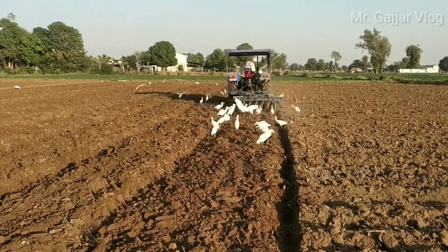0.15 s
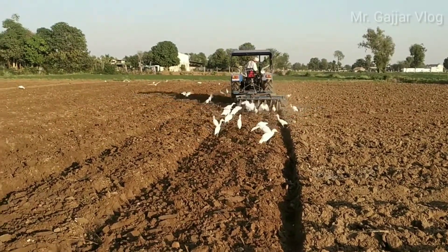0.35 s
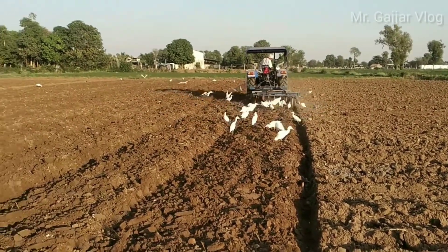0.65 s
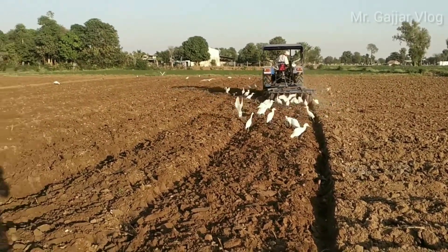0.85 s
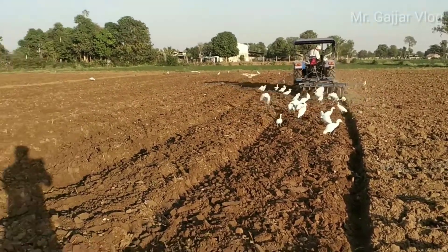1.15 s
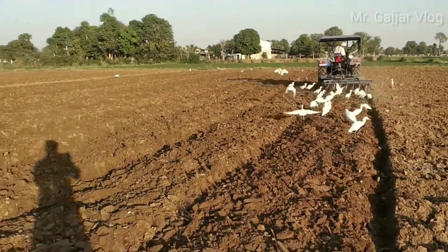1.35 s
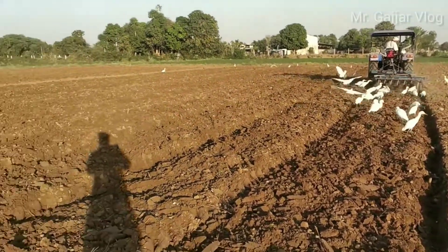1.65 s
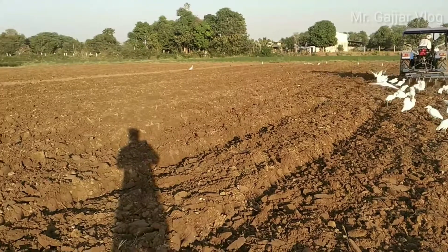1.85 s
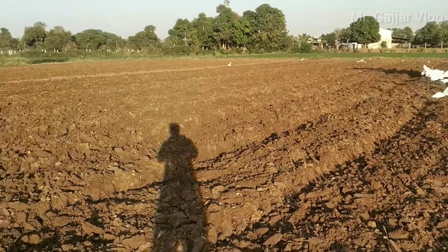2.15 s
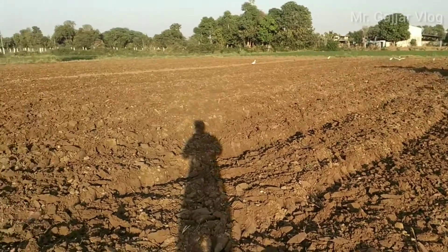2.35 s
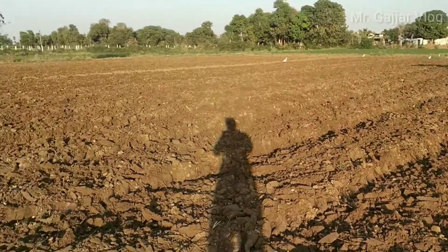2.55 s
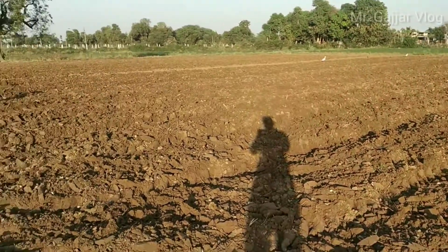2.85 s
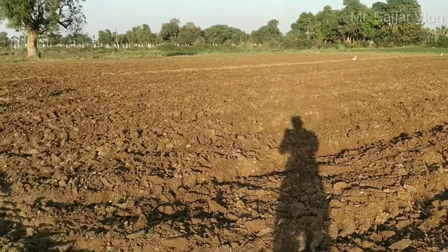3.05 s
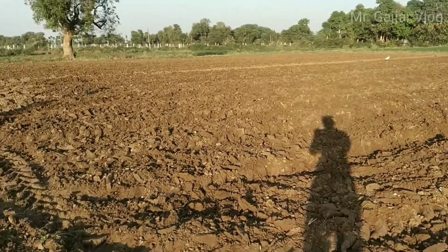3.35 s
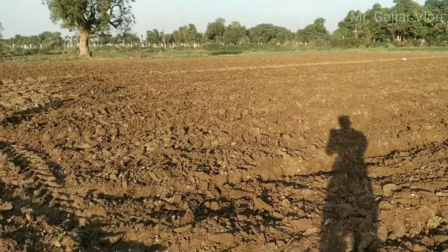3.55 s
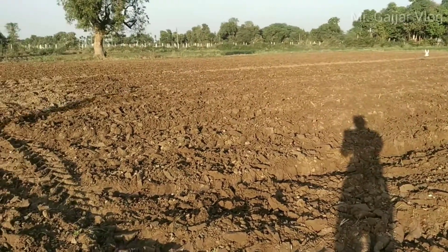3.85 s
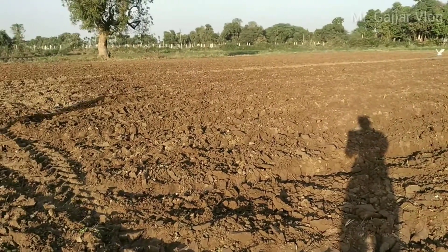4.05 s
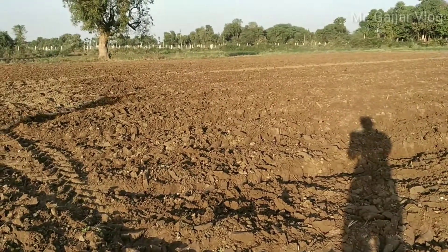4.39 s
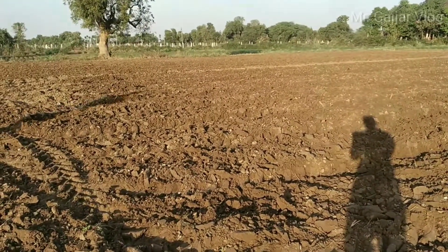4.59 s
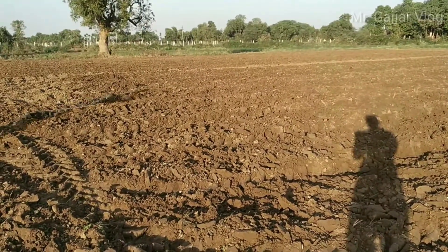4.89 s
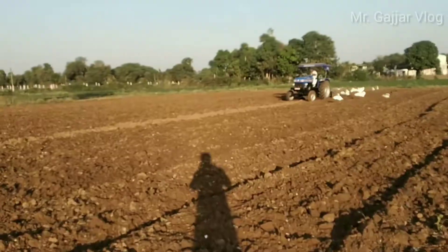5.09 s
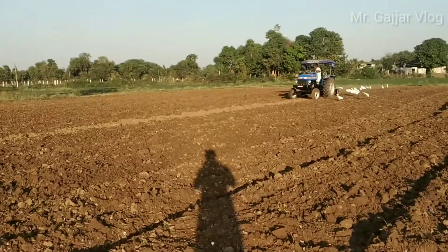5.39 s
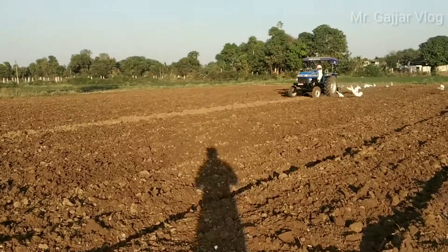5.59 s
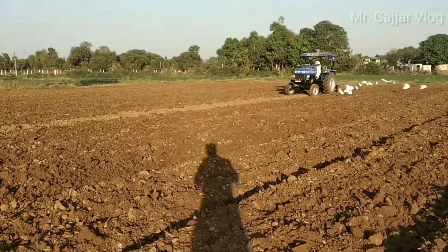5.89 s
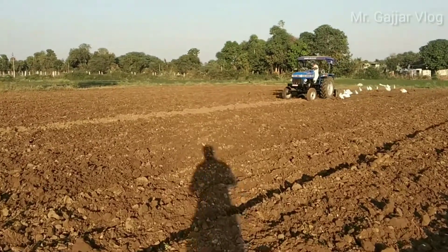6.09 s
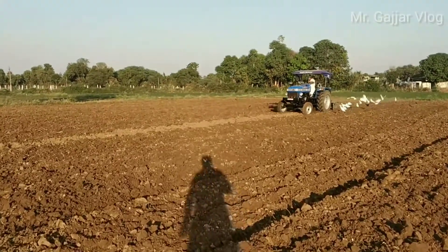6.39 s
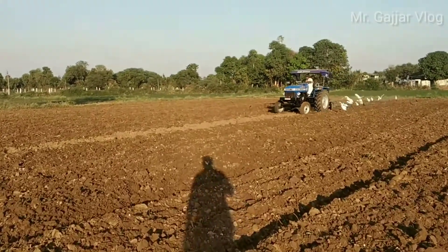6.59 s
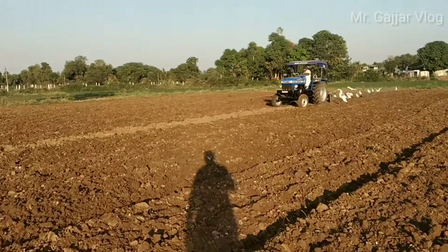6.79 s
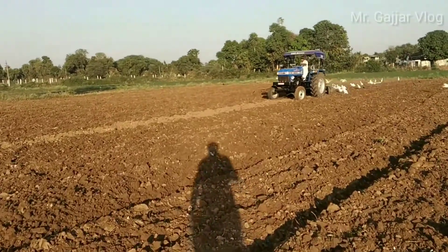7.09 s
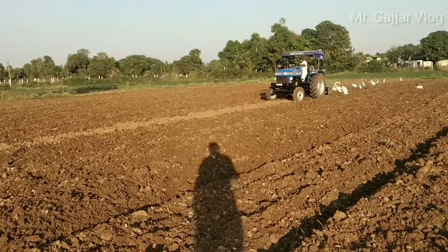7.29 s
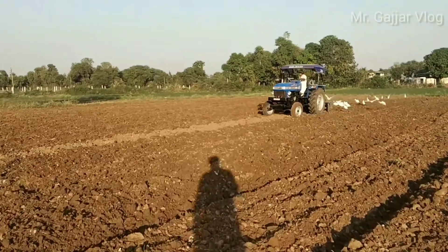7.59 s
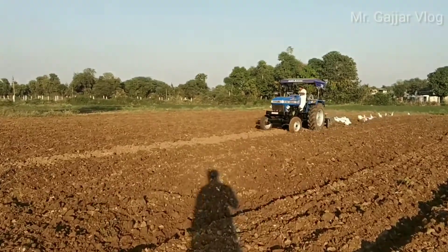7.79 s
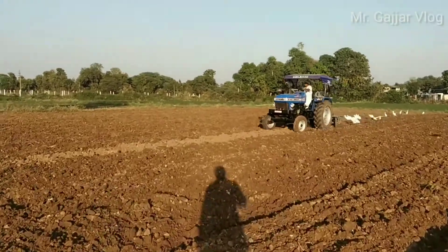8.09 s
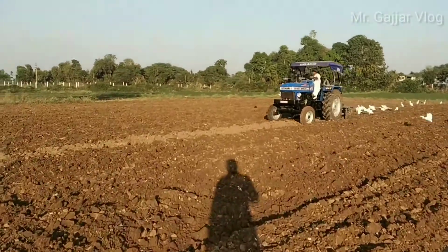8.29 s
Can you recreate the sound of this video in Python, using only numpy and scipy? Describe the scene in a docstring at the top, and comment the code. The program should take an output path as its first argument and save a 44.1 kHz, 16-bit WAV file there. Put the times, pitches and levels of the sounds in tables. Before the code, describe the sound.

Low wavering tractor drone with metallic clatter and gritty soil hiss, a sharp microphone bump, then suddenly a higher-revving, hard-knocking engine slowly approaching.

```python
"""Diesel tractor with a disc harrow

A three-cylinder tractor first draws away: cycle-locked exhaust lines drone, their speed sagging and recovering.
Timed blows ring its metal, shaped noise makes roar and soil hiss, and enveloped noise and tones grind and squeak.
Touches on the microphone's case thud and click, most strongly just after 4 s.
At 4.84 s the scene switches abruptly: the tractor comes closer at higher revs, knocking brightly."""
import sys
import numpy as np
from scipy import signal
from scipy.fft import rfft, irfft, next_fast_len
from scipy.io import wavfile
from scipy.ndimage import map_coordinates

SR = 44100
rng = np.random.default_rng(int(sys.argv[2]) if len(sys.argv) > 2 else 0)


def generate_wav(signal):
    """Clip the signal to [-1, 1] and save it as 16-bit WAV at the path in sys.argv[1]."""
    frames = np.transpose(np.atleast_2d(signal))
    scaled = np.clip(frames, -1, 1) * 32767
    pcm = np.round(scaled).astype(np.int16)
    wavfile.write(sys.argv[1], SR, pcm)


N = 372204
T = np.arange(N) / SR
SWITCH_S = 4.84

# tractor metal resonances, going away: (frequency [Hz], width [Hz], relative level [dB])
PANEL_MODES_AWAY = [(596, 102, 5), (720, 185, -3.5)]
BLOCK_MODES_AWAY = [(930, 210, -2), (1340, 153, 1.5), (1690, 330, -8)]


def amp(db):
    """Decibels to gain."""
    return 10 ** (np.asarray(db) / 20)


def unit(x):
    """x at rms 1."""
    return x / np.sqrt(np.mean(x ** 2) + 1e-20)


def curves(rows):
    """One value per sample for each column after the time."""
    s, *cols = np.transpose(rows)
    return [np.interp(T, s, c) for c in cols]


def wobble(rate_hz):
    """A smooth random curve, rate_hz knots a second."""
    knots = rng.standard_normal(int(N * rate_hz / SR) + 4)
    return map_coordinates(knots, [T * rate_hz])


def swell(s, length_s):
    """Bell envelope around time s, down to e^-2 at length_s either side."""
    return np.exp(-2 * ((T - s) / length_s) ** 2)


def turning(s, duration_s, before, after):
    """A smooth change from one value to another around time s."""
    return before + (after - before) * (1 + np.tanh((T - s) / duration_s)) / 2


def filtered(x, response):
    """x times a complex response of frequency."""
    m = next_fast_len(N + SR // 2)
    return irfft(rfft(x, m) * response(np.fft.rfftfreq(m, 1 / SR)), m)[:N]


def ring(x, modes):
    """x through parallel (Hz, width Hz, dB) resonances of alternating sign."""
    def response(f):
        return sum((-1) ** k * amp(db) * 1j * f * width / (hz * hz - f * f + 1j * f * width)
                   for k, (hz, width, db) in enumerate(modes))
    return filtered(x, response)


def coloured(x, spectrum):
    """x shaped by (Hz, dB) points, at rms 1."""
    hz, db = np.transpose(spectrum)
    return unit(filtered(x, lambda f: amp(np.interp(np.log(f + 1), np.log(hz), db))))


def cyclic(cycle, share):
    """White noise of which a power share comes back alike in every engine cycle."""
    pattern = rng.standard_normal(size=4096)
    alike = pattern[(cycle % 1 * len(pattern)).astype(int)]
    return np.sqrt(share) * alike + np.sqrt(1 - share) * rng.standard_normal(N)


def firing(cycle, place, depth_db, regular):
    """White noise that swells with each of the three firings of a cycle."""
    return cyclic(cycle, regular) * amp(depth_db * np.cos(2 * np.pi * 3 * (cycle - place)))


def hunting(t):
    """The governor's swing around the asked speed, in rpm; it builds up, then settles."""
    period_s, crest_s = 0.504, 0.383
    # swing of the engine speed: (time [s], amplitude [rpm])
    hunt_depth = [(0, 20), (2.4, 42), (4, 22), (4.2, 0)]
    return np.cos(2 * np.pi * (t - crest_s) / period_s) * np.interp(t, *np.transpose(hunt_depth))


def exhaust(cycle, column, booms, waver_db, waver_rate_hz):
    """Pipe drone: cycle-locked lines waver and swell as they slide into the pipe's resonances."""
    # exhaust lines: (multiple of the four-stroke cycle, away [relative dB], closer [relative dB])
    exhaust_lines = [(3, -16.5, -14.5), (4, -21, -16.5), (5, -22, -16), (6, 1.5, -2.5), (7, -19.5, -24.5),
                     (8, -29, -26.5), (9, -15.5, -16), (10, -18.5, -39), (11, -30, -28.5), (12, -27, -30.5),
                     (14, -40.5, -34), (15, -44, -31.5), (18, -45.5, -34), (21, -32, -37), (24, -29.5, -36),
                     (27, -38, -48)]
    cycle_hz = np.gradient(cycle)[::100] * SR
    drone = 0
    for row in exhaust_lines:
        order = round(row[0])
        boom_db = sum(db * np.exp(-((order * cycle_hz - hz) / width) ** 2) for hz, width, db in booms)
        level_db = row[column] + np.interp(T, T[::100], boom_db) + waver_db * wobble(waver_rate_hz)
        drone = drone + amp(level_db) * np.sin(2 * np.pi * (order * cycle + rng.random()))
    return unit(drone)


def knocking(cycle, blows, column, modes, scatter_db, jitter_s, rattle, rattle_s, regular):
    """The same blows return every cycle; each trails a short rattle and rings the metal."""
    blows = np.array(blows)
    places = np.arange(int(cycle[-1]) + 1)[:, None] + blows[:, 0]
    when = np.interp(places, cycle, T) + jitter_s * rng.standard_normal(places.shape)
    size = amp(blows[:, column] + scatter_db * rng.standard_normal(places.shape))
    inside = (when > 0) & (places < cycle[-1])
    hits = np.bincount((when[inside] * SR).astype(int), size[inside], N)[:N]
    trail = signal.lfilter([1], [1, -np.exp(-1 / (rattle_s * SR))], hits)
    rattling = unit(trail * cyclic(cycle, regular))
    return unit(ring(unit(hits) + rattle * rattling, modes))


def puffing(cycle, spectrum, place, depth_db, regular):
    """Firing noise shaped by (Hz, dB) points."""
    return coloured(firing(cycle, place, depth_db, regular), spectrum)


def whine(cycle, levels_db, waver_db, smear_rad):
    """Gear lines follow the engine speed; each wavers in level and phase."""
    # gear tooth lines: (multiple of the four-stroke cycle)
    gear_orders = [33.3, 44.35, 52.1, 66.5, 76.3, 78.1, 80.2, 84.2, 88.4, 89.7, 99.1]
    lines = 0
    for order, db in zip(gear_orders, levels_db):
        level = amp(db) * unit(amp(waver_db * wobble(12)))
        lines = lines + level * np.sin(2 * np.pi * order * cycle + smear_rad * wobble(14))
    return np.sqrt(2) * lines


def reflected(x, lag_ms, share, low_hz, dull_hz, turn_rad):
    """A body returns a dulled, phase-turned echo; its changing lag slides notches through the sound."""
    thin = filtered(x, lambda f: f ** 4 / (f ** 4 + low_hz ** 4) / (1 + (f / dull_hz) ** 2))
    echo = signal.hilbert(thin, next_fast_len(N))[:N]
    delayed = np.interp(T - lag_ms / 1000, T, echo)
    return x + share * np.real(np.exp(1j * turn_rad) * delayed)


def going_away():
    """From behind, the exhaust surges with the fuel, metal knocks every cycle and soil hisses off the discs."""
    # speed that the throttle asks for: (time [s], speed [rpm])
    throttle = [(2.275, 1439.8), (3.814, 1589.9), (4.84, 1552.6)]
    # pipe resonances: (frequency [Hz], width [Hz], boost [dB])
    pipe_booms = [(107.5, 9.2, 10), (308, 15, 3), (352, 10, 8)]
    # blows of pistons, valves, injectors: (place in cycle [0-1], panel [relative dB], block [relative dB])
    blows = [(.05, -9, -10), (.22, -5.5, -7), (.42, -13, -2), (.55, -4, -3), (.67, -3.5, 0), (.77, -14, -3),
             (.885, -1, -10), (.98, -12, -3)]
    # engine, fan and soil roar: (frequency [Hz], relative level [dB])
    roar_spectrum = [(59, -36), (100, 0.5), (120, -24.5), (135, -3.5), (177, -13.5), (220, -19), (310, -15),
                     (390, -15), (619, -19.5), (733, -15.5), (845, -18), (1660, -21.5), (2200, -54),
                     (2860, -65), (4840, -120)]
    # soil hiss before and after the hand shifts: (frequency [Hz], relative level [dB])
    open_hiss = [(1060, -25), (1800, 1), (2410, -6.5), (2930, -4), (3320, 1), (3790, 1.5), (4540, -11),
                 (5310, -6), (6770, -13), (7580, -11.5), (8020, -20), (10400, -47.5), (17600, -120)]
    grip_hiss = [(1060, -29), (1800, 2), (2400, -1.5), (2900, -1.5), (3550, 3), (4400, -3.5), (5400, -5),
                 (6800, -13.5), (7700, -6), (8100, -16), (10400, -46)]
    # soil hiss before its waver: (time [s], level [dB])
    soil_levels = [(0, -58), (.8, -56), (1.5, -59), (2.05, -58.5), (2.35, -55.5), (3.0, -57.5),
                   (3.4, -56.5), (3.95, -57), (4.25, -57.5), (4.52, -54.5), (4.8, -56.5)]
    # gear lines, one per order: (level [dB])
    gear_levels_db = [-72, -68, -66, -65, -68.5, -77, -80.5, -69, -70, -74, -81]
    # echo lag as the person holding the microphone turns and sways: (time [s], lag [ms])
    echo_lags = [(0, 1.81), (.9, 1.8), (1.4, 1.59), (1.9, 1.56), (2.25, 1.35), (2.75, 1.27), (3.07, 1.11),
                 (3.35, 1.08), (3.9, .95), (4.4, .92)]
    fuel_lead_s, full_fuel_rpm = 0.024, 30  # fuel surges ahead of the speed; 30 rpm of swing is a full surge
    grip_s = 4.07  # the shifted hand then shades the block

    rpm = curves(throttle)[0] + hunting(T)
    cycle = np.cumsum(rpm) / (2 * 60 * SR)
    fuel = hunting(T + fuel_lead_s) / full_fuel_rpm
    panel_db = -52.5 - 0.78 * T  # fades as the tractor draws off
    block_db = -58 - 5 * (T > grip_s)
    drone = amp(-33 + 0.7 * fuel) * exhaust(cycle, 1, pipe_booms, waver_db=0.6, waver_rate_hz=11)
    panel = amp(panel_db) * knocking(cycle, blows, 1, PANEL_MODES_AWAY, scatter_db=1.5, jitter_s=0.0003,
                                     rattle=1.1, rattle_s=0.006, regular=0.35)
    block = amp(block_db) * knocking(cycle, blows, 2, BLOCK_MODES_AWAY, scatter_db=2.0, jitter_s=0.0002,
                                     rattle=2.5, rattle_s=0.008, regular=0.4)
    roar_db = (panel_db + block_db) / 2 + 9.5
    roar = amp(roar_db) * puffing(cycle, roar_spectrum, place=0.55, depth_db=0.5, regular=0.32)
    before = puffing(cycle, open_hiss, place=0.29, depth_db=2.0, regular=0.28)
    after = puffing(cycle, grip_hiss, place=0.29, depth_db=2.0, regular=0.28)
    hiss = amp(curves(soil_levels)[0] + 0.9 * wobble(24)) * np.where(T < grip_s, before, after)
    gears = whine(cycle, gear_levels_db, waver_db=6.0, smear_rad=0.46)
    share = turning(grip_s, 0.05, before=0.48, after=0.45)
    return drone + reflected(panel + block + roar + hiss + gears, curves(echo_lags)[0], share,
                             low_hz=330, dull_hz=3300, turn_rad=0.1)


def harrow():
    """Discs grind clods as bursts of gritty noise and squeak as brief, chattering tones."""
    # discs grinding through clods: (time [s], length [s], level [dB])
    scrapes = [(.33, 0.23, -58.5), (0.485, 0.011, -53), (0.54, 0.023, -47), (0.573, 0.019, -43),
               (0.617, 0.012, -50), (0.658, .012, -55), (1.024, 0.033, -59), (1.3, 0.069, -57),
               (1.75, 0.077, -55.5), (3.316, 0.078, -52.5)]
    # disc squeaks: (time [s], length [s], frequency [Hz], level [dB])
    squeak_events = [(0.534, .026, 4800, -53), (.582, .025, 4800, -58), (0.962, 0.065, 4810, -58.5),
                     (1.016, .03, 5450, -63.5), (1.285, 0.04, 4800, -62), (1.315, 0.032, 5390, -60.5),
                     (1.72, 0.032, 5400, -61), (1.79, .028, 5370, -63)]
    soil = coloured(rng.standard_normal(N), [(700, -12.5), (1600, 2.5), (3300, 15), (4200, 11),
                                             (5500, 6.5), (8000, -3.0)])
    grit = unit(soil * amp(2.5 * wobble(310)))
    grinding = grit * sum(amp(db) * swell(s, length) for s, length, db in scrapes)
    chatter = unit(amp(3 * wobble(120)))
    slip_rad = 0.9 * wobble(200)
    squeaks = chatter * sum(amp(db) * swell(s, length) * unit(np.sin(2 * np.pi * hz * T + slip_rad))
                            for s, length, hz, db in squeak_events)
    return grinding + squeaks


def stray_knocks():
    """Single stronger knocks ring the tractor's panels and block."""
    # stray knocks: (time [s], peak level [dB])
    knocks = [(.385, -42), (.495, -40), (1.298, -31.5), (2.153, -37)]
    modes = PANEL_MODES_AWAY + BLOCK_MODES_AWAY
    peak = np.abs(ring(signal.unit_impulse(N), modes)).max()
    s, db = np.transpose(knocks)
    return ring(np.bincount((s * SR).astype(int), amp(db), N), modes) / peak


def hollowed(x):
    """The microphone's case swallows a share of some bands."""
    # case dips: (frequency [Hz], width [Hz], share removed [0-1])
    case_dips = [(526, 200, 0.3), (1570, 110, 0.5), (4300, 1100, 0.6)]
    for hz, width_hz, share in case_dips:
        x = x - share * ring(x, [(hz, width_hz, 0)])
    return x


def bumps():
    """Fingers slip on the case in soft dents; it springs back with a push and swings in a low thud."""
    # touches, before the case dips: (time [s], thud gain [dB], click gain [dB], contact half-width [s])
    touches = [(4.009, -48, -28, 0.00013), (4.0514, -50, -16.5, 0.0002), (4.05208, -55, -20, 0.0001),
               (4.0527, -36, -15.5, 0.00012), (4.05368, -13.5, -14, 0.00011), (4.0566, -55, -28, .00012),
               (4.0682, -42, -20, 0.00008), (4.0705, -40, -24, 0.00007), (4.579, -55, -31, 0.00016),
               (4.762, -58, -25.5, 0.00014), (4.842, -38, -26, .0005), (5.832, -45, -26, 0.0003)]
    lead = SR // 200
    t = np.arange(-lead, SR // 4) / SR
    after = np.maximum(t, 0)
    swing = np.cos(2 * np.pi * 64 * after) * amp(-60 * after / 0.087)
    push = 1.4 * np.exp(-after / 0.0011)
    thud = (swing + push) * (1 - np.exp(-after / 0.00031))
    out = np.zeros(N + SR)
    for s, thud_db, click_db, contact_s in touches:
        dent = 1 / (1 + (t / contact_s) ** 2)
        scratch = 0.05 * rng.standard_normal(len(t)) * amp(-60 * np.abs(t) / 0.0037)
        start = round(s * SR) - lead
        out[start:start + len(t)] += amp(thud_db) * thud - amp(click_db) * (dent + scratch)
    return hollowed(out[:N])


def coming_closer():
    """From the front, the block knocks and injectors rasp; drone and panels grow as the distance shrinks."""
    # pipe resonances: (frequency [Hz], width [Hz], boost [dB])
    pipe_booms = [(104.5, 11.6, 5.8)]
    # blows of pistons, valves, injectors: (place in cycle [0-1], panel [relative dB], block [relative dB])
    blows = [(.03, -6, -22), (.145, -12, -1), (.21, -6, 0), (.3, -16, -9), (.37, -4.5, -20),
             (.445, -3.5, -20), (.48, -20, -2), (.548, -9, 0), (.66, 0, -11), (.755, -8, -6),
             (.835, -8, -7), (.895, -4.5, -4.5), (.955, -10, -5)]
    # panels, block, injector lines and bonnet: (frequency [Hz], width [Hz], relative level [dB])
    panel_modes = [(551.6, 62, 2.5), (678, 95, -1), (862, 152, -2.5)]
    block_modes = [(1033, 48, 0), (1209, 80, -3.5), (1385, 96, -1.5), (1780, 480, -17.5), (2387, 52, -15)]
    injector_modes = [(2380, 220, -4), (2893, 98, -2), (3570, 72, -2), (5160, 41, -7)]
    bonnet_modes = [(1993, 200, 2), (3780, 380, -2)]
    # roar, injector rasp, pipe gas noise and top treble: (frequency [Hz], relative level [dB])
    roar_spectrum = [(59, -22), (100, -15), (125, 0), (177, -26.5), (290, -24.5), (400, -26), (520, -13),
                     (700, -10.5), (870, -10), (1050, -13), (1350, -9), (1650, -20), (2050, -19),
                     (2900, -57.5), (4800, -120)]
    rasp_spectrum = [(1060, -28.5), (1800, -10.5), (2350, -4), (3000, -7), (3560, -2.5), (4300, -9.5),
                     (5200, -9), (7260, -13.5), (7720, -15.5), (8020, -47), (10400, -76)]
    chuff_spectrum = [(100, -38), (145, 4.5), (178, 5.5), (215, -7), (300, -5.5), (480, -13), (900, -46)]
    sizzle_spectrum = [(3500, -38.5), (5200, -10), (6100, 1.5), (6600, 4.5), (7600, 1.5), (8100, -24)]
    # block knock, injector ring, bonnet ring and top treble: (time [s], level [dB])
    knock_levels = [(4.88, -43.5), (5.3, -43.5), (5.69, -45), (6.08, -45), (6.3, -48.5), (6.77, -49),
                    (7.4, -50), (7.8, -46.5), (8.1, -46.5), (8.4, -45.5)]
    injector_levels = [(4.9, -73), (5.7, -55), (6.0, -53), (6.3, -59), (7.3, -56), (8.3, -56)]
    bonnet_levels = [(4.85, -52.5), (5.15, -52.5), (5.33, -47.5), (5.6, -48.5), (5.95, -53.5), (6.3, -60),
                     (6.8, -70)]
    treble_levels = [(4.85, -58), (5.2, -56), (5.6, -63), (6.0, -63.5), (6.6, -69), (7.4, -71), (8.4, -66)]
    # injector rasp, 2.5 dB above its final level: (time [s], level [dB])
    rasp_levels = [(5.0, -50.5), (5.55, -53), (6.24, -49.5), (8.3, -45.5)]
    # gear lines, one per order: (level [dB])
    gear_levels_db = [-61.5, -58.5, -68, -64.5, -68.5, -65, -59, -59, -58.5, -59, -64.5]
    # echo lag as the person holding the microphone turns and sways: (time [s], lag [ms])
    echo_lags = [(4.87, 1.25), (5.25, 1.2), (5.6, 1.28), (5.92, 1.3), (6.0, 1.6), (6.12, 1.62), (6.3, 1.73),
                 (6.55, 1.79), (6.8, 1.8), (7.0, 1.73), (7.3, 1.81), (7.52, 1.84), (7.72, 1.64),
                 (7.85, 1.66), (8.1, 1.77), (8.25, 1.75), (8.44, 1.67)]
    rpm, start_cycles, wander_cycles = 1807.1, 0.956, 0.005  # start is the place in the cycle at T = 0
    distance_m, approach_m_per_s = 31, 1.9
    quick_turn_s, quick_turn_length_s = 5.96, 0.04

    cycle = start_cycles + rpm * T / (2 * 60) + wander_cycles * wobble(4)
    elapsed_s = np.maximum(T - SWITCH_S, 0)
    nearness_db = -20 * np.log10(1 - approach_m_per_s * elapsed_s / distance_m)
    pipe_db = -37 + nearness_db + 0.75 * elapsed_s  # grows faster than nearness alone makes it
    chuff_db = pipe_db - 18 + 1.5 * elapsed_s  # grows faster than the drone
    panel_db = -48.5 + nearness_db
    block_db = curves(knock_levels)[0]
    drone = amp(pipe_db) * exhaust(cycle, 2, pipe_booms, waver_db=0.6, waver_rate_hz=7)
    chuff = amp(chuff_db) * puffing(cycle, chuff_spectrum, place=0.14, depth_db=3.0, regular=0.41)
    panel = amp(panel_db) * knocking(cycle, blows, 1, panel_modes, scatter_db=2.2, jitter_s=0.00009,
                                     rattle=0.8, rattle_s=0.005, regular=0.5)
    block = amp(block_db) * knocking(cycle, blows, 2, block_modes, scatter_db=1.1, jitter_s=0.00003,
                                     rattle=0.6, rattle_s=0.003, regular=0.65)
    roar_db = (panel_db + block_db) / 2 + 3.5
    roar = amp(roar_db) * puffing(cycle, roar_spectrum, place=0.17, depth_db=0.5, regular=0.36)
    rasp_db = curves(rasp_levels)[0] - 2.5
    rasp = amp(rasp_db) * puffing(cycle, rasp_spectrum, place=0.2, depth_db=1.5, regular=0.25)
    injector_drive = firing(cycle, place=0.14, depth_db=3.0, regular=0.3)
    injectors = amp(curves(injector_levels)[0]) * unit(ring(injector_drive, injector_modes))
    bonnet_drive = firing(cycle, place=0.14, depth_db=3.0, regular=0.33)
    bonnet = amp(curves(bonnet_levels)[0]) * unit(ring(bonnet_drive, bonnet_modes))
    treble = puffing(cycle, sizzle_spectrum, place=0.17, depth_db=3.5, regular=0.37)
    sizzle = amp(curves(treble_levels)[0]) * treble
    gears = whine(cycle, gear_levels_db, waver_db=4.5, smear_rad=1.0)
    engine = panel + block + roar + rasp + injectors + bonnet + sizzle + gears
    turn_rad = turning(quick_turn_s, quick_turn_length_s, before=-1.85, after=1.22)
    share = turning(quick_turn_s, quick_turn_length_s, before=0.55, after=0.88)
    return drone + chuff + reflected(engine, curves(echo_lags)[0], share,
                                     low_hz=520, dull_hz=3100, turn_rad=turn_rad)


def scene():
    """The two views follow each other without a fade, joined by a tick of noise."""
    away = going_away() + harrow() + stray_knocks()
    tick = amp(-34) * swell(SWITCH_S + 0.0036, 0.0018) * rng.standard_normal(N)
    return (np.where(T < SWITCH_S, away, coming_closer()) + bumps() + tick)[None]


def record(dry):
    """The recorder cuts the deepest rumble and falls steeply above its band limit."""
    top_hz = 8100
    lean = signal.sosfilt(signal.butter(2, 22, 'highpass', fs=SR, output='sos'), dry[0])
    return filtered(lean, lambda hz: 1 / np.sqrt(1 + (hz / top_hz) ** 100))[None]


dry = scene()
out = record(dry)
generate_wav(out)
```